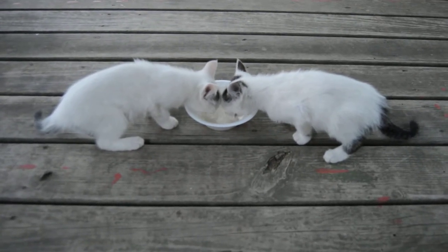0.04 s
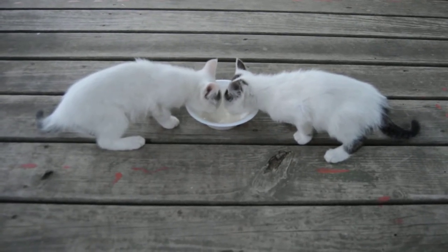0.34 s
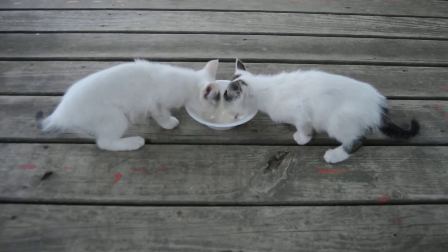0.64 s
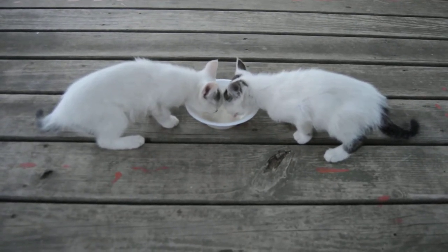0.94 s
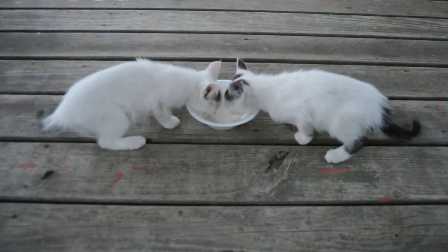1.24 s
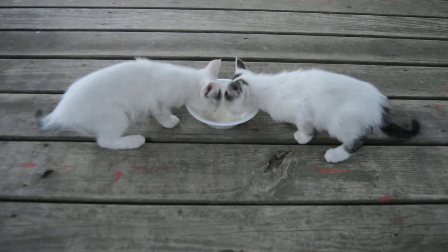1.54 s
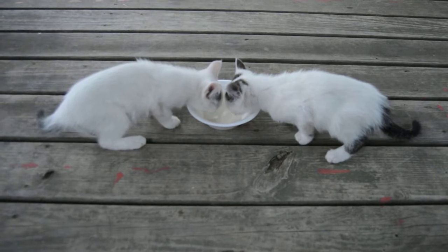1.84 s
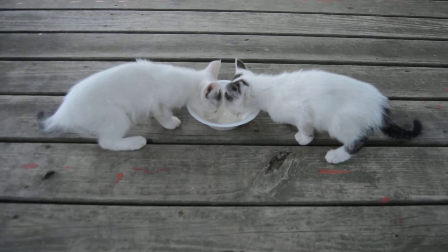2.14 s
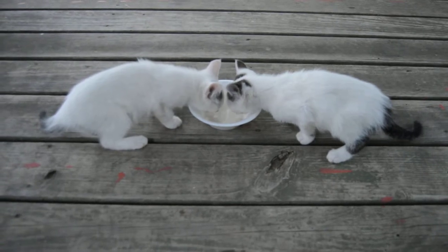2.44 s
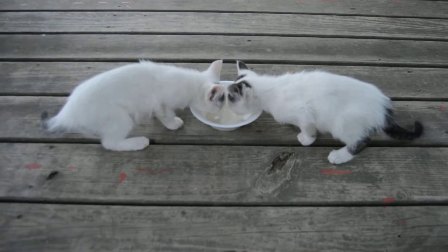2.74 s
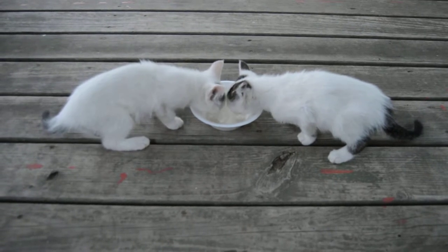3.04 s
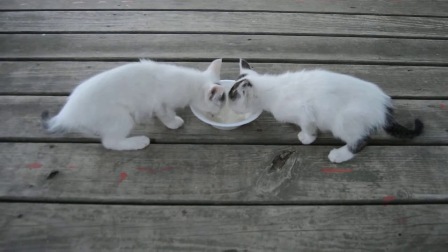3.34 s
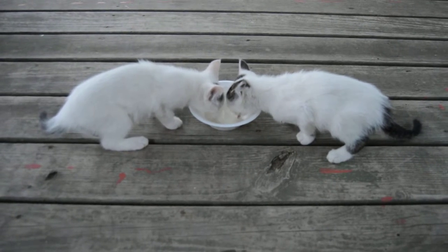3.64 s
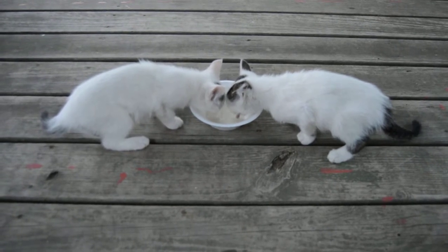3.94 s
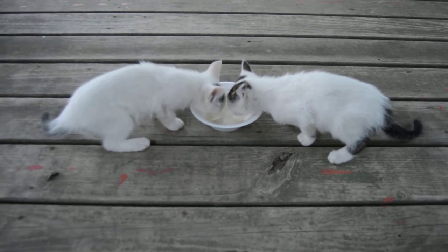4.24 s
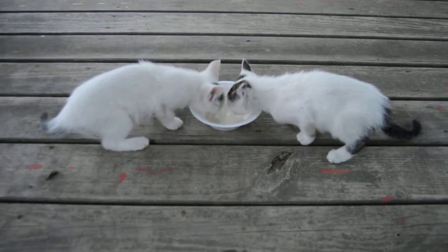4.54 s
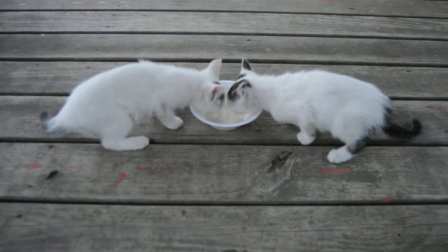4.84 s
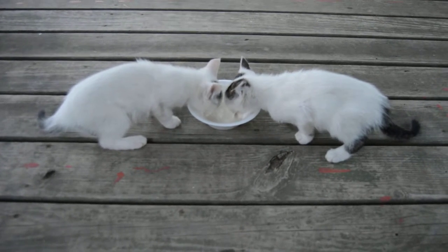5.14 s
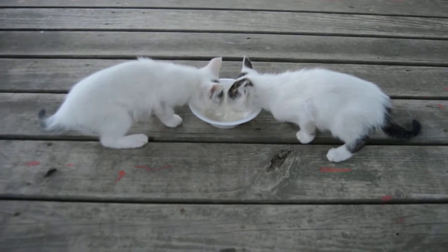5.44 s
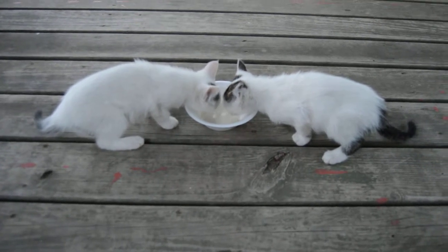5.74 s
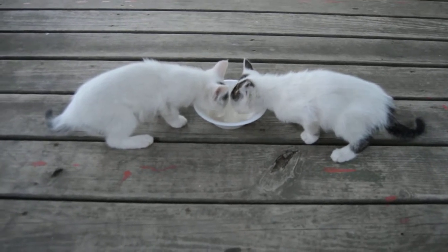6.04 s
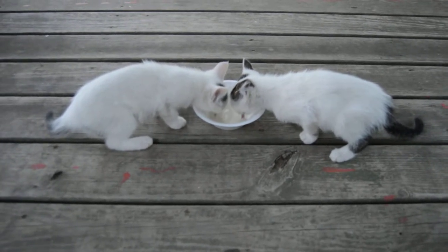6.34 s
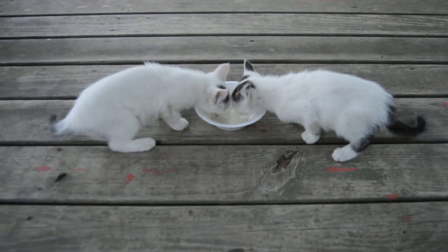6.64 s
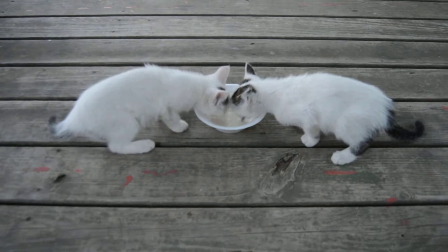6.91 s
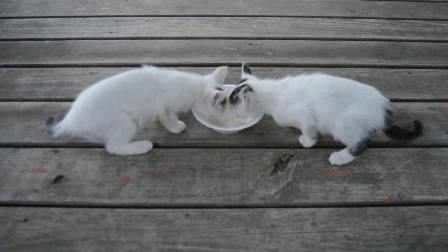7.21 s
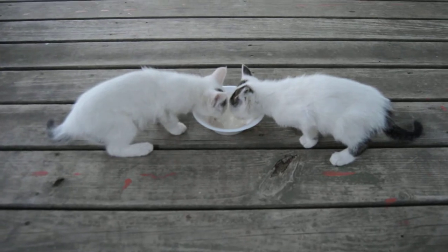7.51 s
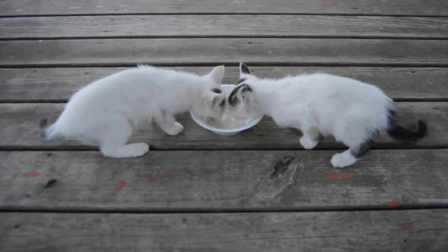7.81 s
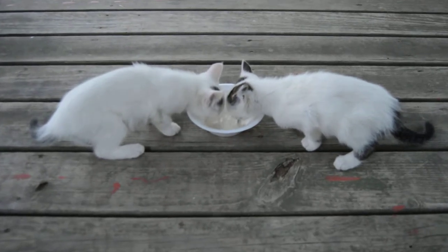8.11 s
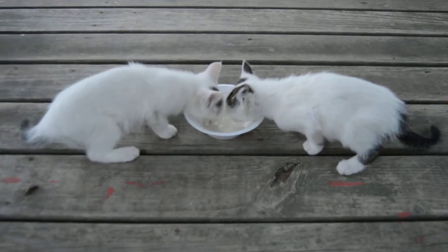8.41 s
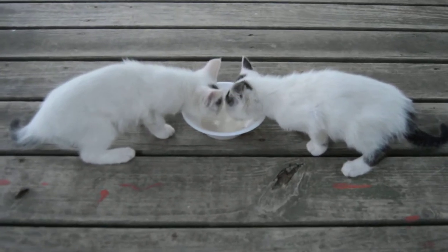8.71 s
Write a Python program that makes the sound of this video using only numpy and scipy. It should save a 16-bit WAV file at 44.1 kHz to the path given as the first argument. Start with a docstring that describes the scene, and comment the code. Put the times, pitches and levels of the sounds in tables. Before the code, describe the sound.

Outdoors on a wooden deck, two kittens drink from a bowl close to the microphone, making small wet smacks and clicks while crickets chirp all around. A soft bump on the boards comes early, then three loud, briefly ringing knocks in quick succession. After the midpoint the smacking turns sharper for a moment, with some brief scrapes. A low, distant background rumble and light hiss lie underneath.

```python
"""Kittens lapping among crickets

Crickets chirp around a wooden deck by scraping one wing over the other. Two kittens lap from
a bowl: wet films tear and ring their mouths as smacks, and tiny bubbles tick. Close by come
a few soft bumps on the boards, three loud knocks that clatter and ring, and short scuffs.
Under it all lie a low outdoor rumble and murmur and a faint hiss."""
import sys
import numpy as np
from scipy import signal
from scipy.fft import rfft, irfft, next_fast_len
from scipy.io import wavfile
from scipy.ndimage import uniform_filter1d, map_coordinates

SR = 44100
rng = np.random.default_rng(int(sys.argv[2]) if len(sys.argv) > 2 else 0)


def store_wav(level_fs):
    """Save 16-bit WAV to argv[1]."""
    pcm = np.round(np.clip(np.atleast_2d(level_fs), -1, 1) * 32767)
    wavfile.write(sys.argv[1], SR, pcm.T.astype(np.int16))


N = 395577


def amp(db):
    """Turn decibels into a number to multiply a sound by."""
    return 10 ** (np.asarray(db) / 20)


def unit(x):
    """Scale a signal so its average strength (rms) is 1."""
    return x / np.sqrt(np.mean(x ** 2) + 1e-20)


def curves(rows):
    """Join (time, values...) rows with straight lines: one curve for each value column."""
    times, *columns = np.transpose(rows)
    return [np.interp(np.arange(N) / SR, times, column) for column in columns]


def wobble(rate):
    """A smooth curve through `rate` random points a second."""
    points = rng.standard_normal(int(N * rate / SR) + 4)
    return map_coordinates(points, [np.arange(N) * rate / SR])


def flutter(size, smooth):
    """A fast random tremble: noise averaged over `smooth` samples."""
    return unit(uniform_filter1d(rng.standard_normal(size), size=smooth))


def add(track, s, sound):
    """Mix a sound into the track, starting at s seconds."""
    start = int(np.clip(round(s * SR), 0, N))
    track[start:start + len(sound)] += sound[:N - start]


def noise(colour, size=N, tilt_db=0):
    """Noise shaped by (pitch [Hz], level [dB]) points, plus tilt_db for each octave up."""
    octave = np.log2(np.fft.rfftfreq(size, 1 / SR) + 1)
    hz, db = np.transpose(colour)
    gain = amp(np.interp(octave, np.log2(hz), db) + tilt_db * octave)
    return unit(irfft(rfft(rng.standard_normal(size)) * gain, size))


def swell(t, rise, t60):
    """A loudness shape: it climbs to 1 in `rise` seconds, then fades 60 dB every t60 seconds."""
    return np.minimum(t / rise, 1) ** 2 * amp(-60 * np.maximum(t - rise, 0) / t60)


def resonate(x, hz, q):
    """Make a sound ring at one pitch; a higher q rings longer."""
    return signal.lfilter(*signal.iirpeak(min(hz, SR / 3), max(q, 1), SR), x)


def echoes(x, echo_db, t60):
    """The sound plus its scattered reflections from deck and walls."""
    t = np.arange(SR // 2) / SR
    tail = rng.standard_normal(len(t)) * swell(t, 0.0018, t60)
    return x + amp(echo_db) * signal.fftconvolve(x, tail / np.linalg.norm(tail))[:N]


def air():
    """A low rumble and a distant murmur rise and fall over an even hiss."""
    # how loud the background is: (time [s], rumble level [dB], murmur level [dB])
    levels = [(0.0, -73, -56.5), (0.72, -70.5, -58.5), (1.31, -63, -54), (1.78, -69, -51.5),
              (2.15, -69, -55.5), (2.9, -68.5, -54.5), (3.22, -66.5, -61), (3.49, -55, -50.5),
              (3.79, -67, -62), (4.04, -66, -60), (4.24, -60.5, -57), (4.64, -71, -60.5),
              (6.27, -68.5, -62), (6.52, -70, -59.5), (7.58, -68, -62), (7.91, -68, -59), (8.45, -70, -61),
              (8.9, -64, -58)]
    # the tone colour of each noise: (pitch [Hz], level [dB])
    rumble_colour = [(15, -16), (30, -15), (50, 2), (68, 2.5), (90, -3.5), (160, -2), (260, -11),
                     (500, -41)]
    murmur_colour = [(100, -28), (240, 1.5), (300, 0), (400, 0.5), (600, -0.5), (850, -3), (1200, -5.5),
                     (1700, -16.5), (3000, -15), (6000, -77)]
    hiss_colour = [(300, -10), (1100, 2), (1700, 3), (3000, 1.5), (5500, -2.5), (7200, -4.5), (8600, -3),
                   (9100, -0.5), (9600, -3.5), (10500, -2.5), (12000, -8), (14000, -9.5), (16000, -14)]
    rumble_db, murmur_db = curves(levels)
    rumble = amp(rumble_db + 3.0 + 1.8 * wobble(6)) * noise(rumble_colour)
    murmur = amp(murmur_db - 0.3 + 0.68 * wobble(6.1)) * noise(murmur_colour)
    return rumble + murmur + amp(-57) * noise(hiss_colour)


def chirp(hz, overtone_db, stroke_gap=.03, stroke_s=.022, sag=.1):
    """A wing scrapes a row of tiny teeth four times; each stroke slows, so its pitch sags."""
    # the wing strokes in order: (relative strength)
    strokes = [0.55, 0.84, 0.94, 0.55]
    t = np.arange(int(len(strokes) * stroke_gap * SR)) / SR
    which = np.minimum(t // stroke_gap, len(strokes) - 1).astype(int)
    progress = np.minimum(t % stroke_gap / stroke_s, 1)  # 0 to 1 through each stroke
    detune, force = rng.standard_normal((2, len(strokes)))[:, which]
    pitch = hz * (1 + 0.004 * detune) * (1 - sag * progress ** 2.596)
    phase = 2 * np.pi * np.cumsum(pitch) / SR
    overtones = amp(-3.5) * np.sin(2 * phase) + np.sin(3 * phase)
    tone = np.sin(phase) + amp(overtone_db) * overtones
    grip = 1 + 0.045 * flutter(SR // 4, smooth=30)[:len(t)]  # the teeth catch unevenly
    loudness = np.take(strokes, which) * amp(2.1 * force) * np.sin(np.pi * progress)
    return loudness * grip * tone


def far_crickets(near_song):
    """Five distant crickets, half lost in echo, sing hardest in step with the near ones."""
    # how loud the chorus is: (time [s], level [dB])
    levels = [(0, -51), (1.4, -51.5), (2.6, -50), (3.7, -51.5), (3.87, -53.5), (4.6, -54.5), (5.3, -52.5),
              (6.4, -50.5), (8.97, -53)]
    # their song, blurred into noise by the garden: (pitch [Hz], level [dB])
    blur_colour = [(3000, -57), (3450, -17), (3800, -3.5), (4170, -3.5), (4500, -4), (4800, -7.5),
                   (5400, -17.5), (6500, -26)]
    song = np.zeros(N)
    for hz in np.linspace(4080, 4400, 5):
        gap = rng.uniform(.23, .3)
        for s in np.arange(rng.uniform(0, gap), N / SR, gap):
            add(song, s + rng.normal(0, .012), amp(rng.normal(0, 1)) * chirp(hz, overtone_db=-12.5))
    level_db, = curves(levels)
    near_loudness = unit(uniform_filter1d(np.abs(near_song), size=SR // 20))
    effort = 0.79 + 0.21 * near_loudness
    chorus = unit(echoes(song, echo_db=-5.5, t60=0.073)) + noise(blur_colour)
    return amp(level_db - 3) * effort * chorus


def near_crickets():
    """Crickets close by chirp in steady runs that drift in and out of step."""
    # runs of chirps: (start [s], time between chirps [s], number of chirps, pitch [Hz], level [dB])
    runs = [(0.11, .272, 5, 4320, -48), (0.345, .234, 6, 4280, -41), (1.391, .21, 2, 4330, -49),
            (1.8, .252, 2, 4260, -40.5), (2.32, .16, 2, 4200, -47.5), (2.725, .24, 5, 4210, -42.5),
            (3.044, .283, 4, 4370, -49), (4.37, .304, 4, 4350, -52.5), (4.49, .229, 6, 4260, -46),
            (5.865, .236, 5, 4240, -41), (6.16, .26, 4, 4340, -47), (7.09, .268, 4, 4250, -42.5),
            (7.185, .283, 4, 4310, -47.5), (8.08, .255, 4, 4280, -45), (8.325, .232, 3, 4230, -43.5)]
    song = np.zeros(N)
    for start, gap, count, pitch_hz, level_db in runs:
        for k, (detune, force, haste) in enumerate(rng.standard_normal((int(round(count)), 3))):
            hz = pitch_hz + 24.84 * detune
            db = level_db + 0.4 * force
            overtone_db = np.interp(hz, [4200, 4380], [-20, -13])  # higher chirps are also brighter
            stroke_gap = .03 * np.exp(-.06 * haste)
            sag = .14 + .006 * (db + 42)  # a harder stroke slides farther down in pitch
            add(song, start + k * gap, amp(db) * chirp(hz, overtone_db, stroke_gap, sag=sag))
    return echoes(song, echo_db=-0.7, t60=0.074)


def pop(hz, q, rise, t60):
    """A wet film tears with a crackle and makes a small hollow ring."""
    t = np.arange(SR // 10) / SR
    tearing = amp(5 * flutter(len(t), smooth=20))
    burst = rng.standard_normal(len(t)) * tearing * swell(t, rise, t60)
    ring = resonate(resonate(burst, hz, q), hz, q)
    return ring / np.abs(ring).max()


def lapping():
    """Smacks ring the kittens' mouths and tiny bubbles tick, over the faint beat of two tongues."""
    # the loudest tongue and lip smacks: (time [s], level [dB], mouth pitch [Hz], treble [dB])
    loud_smacks = [(0.419, -35.5, 1300, -19), (0.601, -39, 1200, -14), (0.792, -40, 1220, -11),
                   (1.778, -35.5, 697, -7), (2.308, -38, 1160, -6), (2.913, -36, 770, -20),
                   (4.859, -37.5, 875, -22), (5.532, -17, 2350, -15), (5.619, -27.5, 1110, -33),
                   (5.711, -31.5, 1870, -6), (5.798, -32, 1210, 7), (5.856, -29.5, 1090, 14.5),
                   (6.342, -21.5, 2530, 15), (6.415, -32.5, 610, -3), (7.408, -42, 676, -8),
                   (7.749, -35.5, 1000, -19), (7.842, -36.5, 1050, -20), (8.319, -31, 1320, -2),
                   (8.763, -39, 815, -16)]
    # the sharpest wet ticks: (time [s], level [dB], pitch [Hz])
    sharp_ticks = [(0.5888, -25.5, 10370), (1.637, -37, 6000), (2.1003, -35.5, 10200), (2.3136, -36, 5660),
                   (3.1263, -27.5, 11060), (3.3337, -26.5, 9300), (3.7814, -27.5, 8200),
                   (4.306, -35.5, 8200), (4.744, -32, 6000), (5.498, -33, 6410), (5.5323, -24.5, 5460),
                   (5.7104, -23.5, 6000), (5.8563, -24.5, 5800), (6.061, -31, 11500), (6.276, -32, 8500),
                   (6.3415, -21, 6350), (6.7216, -26, 10500), (7.4989, -36, 7050), (8.2395, -35, 5160),
                   (8.6814, -34, 10100)]
    lap_gap_s = .24
    smacks, ticks = np.zeros(N), np.zeros(N)
    for s, db, hz, treble_db in loud_smacks:
        slow = np.interp(db, [-42, -31], [2.4, 1])  # gentle smacks open more slowly and ring longer
        mouth = pop(hz, q=0.82 * slow, rise=0.0022 * slow, t60=0.024 * slow)
        click = amp(treble_db - 7.5) * pop(7600, q=.9, rise=0.0016, t60=0.005)
        add(smacks, s - .002 * slow, amp(db - 1.5) * (mouth + click))
    bubbles = []
    for offset in rng.random(size=2):  # each kitten laps at its own moment
        for beat in np.arange(offset * lap_gap_s, N / SR, lap_gap_s):
            force, brightness, delay, burst, smallness = rng.random(size=5)
            s = beat + rng.normal(0, 0.037)
            lap = pop(800 + 1100 * brightness ** 2, q=1.33, rise=0.0062, t60=0.051)
            add(smacks, s, amp(-49.5 + 10.5 * force) * lap)
            bubble_db = -50 + 14 * burst ** 3  # a bubble follows each lap; most are faint
            bubble_hz = 5600 + 5700 * smallness
            bubbles.append((s + delay * lap_gap_s, bubble_db, bubble_hz))
    for s, db, hz in list(sharp_ticks) + bubbles:
        add(ticks, s - .001, amp(db) * pop(hz, q=3.9, rise=0.0016, t60=0.0043))  # a tiny ping
        add(ticks, s - .001, amp(db - 9.5) * pop(6400, q=.55, rise=0.0022, t60=.007))  # its fizz
        add(ticks, s + .016, amp(db - 17) * pop(hz, q=1.3, rise=0.0027, t60=0.034))  # the film lets go
    return echoes(smacks, echo_db=-12, t60=0.16) + echoes(ticks, echo_db=-10, t60=0.12)


def bumps():
    """Soft bumps make the wooden boards thud."""
    # each bump: (time [s], level [dB], fade time [s], tilt toward treble [dB per octave])
    thuds = [(0.955, -33, 0.14, -0.5), (2.085, -51.5, 0.39, -8), (3.539, -43, 0.71, 2),
             (4.06, -48, 0.31, -0.5)]
    # the tone colour of the boards: (pitch [Hz], level [dB])
    board_colour = [(10, -70), (40, -20), (70, -6), (120, 1), (180, -5), (300, -2.5), (500, 8.5),
                    (720, -5.5), (980, 3.5), (1400, -4), (2200, -11.5), (4000, -29)]
    out, t = np.zeros(N), np.arange(SR // 2) / SR
    for s, db, t60, tilt_db in thuds:
        add(out, s, amp(db) * noise(board_colour, len(t), tilt_db) * swell(t, 0.0035, t60))
    return out


def knocks():
    """Each knock is a quick rattle of contacts; ringing tones come out of the clatter and fade."""
    # three knocks and a bounce: (time [s], level [dB], rise time [s], fade time [s],
    # clatter tilt [dB per octave], ring level [dB], ring tilt [dB per octave], treble cutoff [Hz])
    hits = [(3.236, -20, 0.0075, 0.18, -1.5, -7.5, -41, 11900),
            (3.567, -11.5, 0.012, 0.19, 0.9, -4, -7.5, 11300),
            (4.149, -9.5, 0.0077, 0.16, 1.4, -9, 3.5, 13900),
            (4.224, -28.5, 0.0016, 0.05, 3, -12.5, 6.5, 6940)]
    # the tone colour of the clatter: (pitch [Hz], level [dB])
    clatter_colour = [(30, -22), (70, -5), (150, -17), (260, -8.5), (480, 2.5), (950, -0.5), (1500, 2.5),
                      (2200, 2), (3400, 0), (4050, -4), (5000, -2), (5800, -3), (8500, -7), (10800, -7),
                      (12200, -20.5), (15500, -16)]
    # the tones that ring in a knock: (pitch [Hz], level [dB], fade time [s])
    tones = [(244.6, -18, 0.21), (449.4, -9.5, 0.076), (526, -14, 0.072), (803, -5.5, 0.12),
             (1083, -13.5, 0.16), (1305, -3.5, 0.13), (1374, -11, 0.2), (1453, -5, 0.2), (1590, -4.5, 0.1),
             (1628, -5.5, 0.21), (2660, -9.5, 0.17), (2815, -7.5, 0.12), (3344, -5.5, 0.19),
             (3410, -2.5, 0.16), (3451, -11, 0.2), (3700, -5.5, 0.13), (4290, -11, .14), (4720, -11, 0.16),
             (4990, -8, 0.11), (5199, -14, 0.085), (6818, -16, 0.12), (8100, -17, .12), (8650, -27, 0.16)]
    out, t = np.zeros(N), np.arange(SR // 2) / SR
    for s, db, rise, t60, tilt_db, ring_db, ring_tilt_db, cutoff_hz in hits:
        rattle = amp(2.25 * flutter(len(t), smooth=110))
        first_touch = amp(-8) * swell(t, 0.0015, 0.021)
        echo = amp(-29.5) * swell(t, rise, 0.82)
        loudness = first_touch + swell(t, rise, t60) + echo
        clatter = unit(noise(clatter_colour, len(t), tilt_db) * rattle) * loudness
        clatter = signal.sosfilt(signal.butter(2, cutoff_hz, fs=SR, output="sos"), clatter)
        ring = np.zeros(len(t))
        for hz, tone_db, tone_t60 in tones:
            jostle = .008 * np.cumsum(rng.standard_normal(len(t))) + rng.random()  # roughens the tone
            hardness_db = ring_tilt_db * np.log2(max(hz / 1400, 1))  # a hard hit wakes the high tones
            gain = amp(tone_db + hardness_db + rng.normal(0, 1))
            ring += gain * swell(t, rise, tone_t60) * np.sin(2 * np.pi * (hz * t + jostle))
        add(out, s, amp(db) * (amp(-5) * clatter + amp(ring_db) * ring))
    return out


def scuffs():
    """Short scrapes, each a bright puff of noise."""
    # each scrape: (time [s], level [dB], rise time [s], fade time [s])
    scrapes = [(5.69, -48, 0.007, .12), (6.337, -31, 0.0015, 0.1), (6.355, -47, 0.029, 0.58),
               (6.42, -41.5, 0.02, 0.1), (7.496, -48.5, .003, 0.088), (7.661, -52, 0.035, 0.58)]
    # their tone colour: (pitch [Hz], level [dB])
    scrape_colour = [(300, -36), (560, 10), (800, -15), (2400, 1), (4500, -20), (6200, 2.5), (7500, -5),
                     (11000, -1.5), (14000, -25)]
    out, t = np.zeros(N), np.arange(SR // 2) / SR
    for s, db, rise, t60 in scrapes:
        add(out, s, amp(db) * noise(scrape_colour, len(t)) * swell(t, rise, t60))
    return out


def scene():
    """All the sounds around the deck, mixed into one channel."""
    near = near_crickets()
    return (near + far_crickets(near) + knocks() + bumps() + scuffs() + lapping() + air())[None]


def record(dry):
    """Cut away the very highest treble."""
    top_hz = 15900
    size = next_fast_len(N + SR // 2)
    kept = np.fft.rfftfreq(size, 1 / SR) < top_hz
    return irfft(rfft(dry, size) * kept, size)[..., :N]


dry = scene()
out = record(dry)
store_wav(out)
```